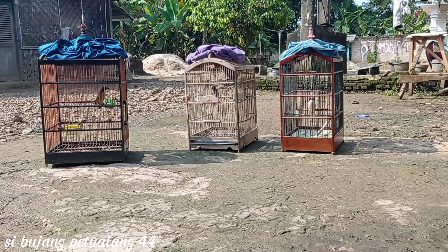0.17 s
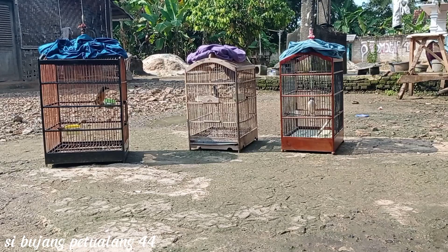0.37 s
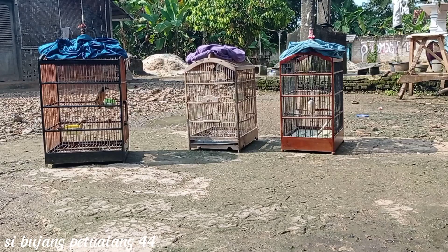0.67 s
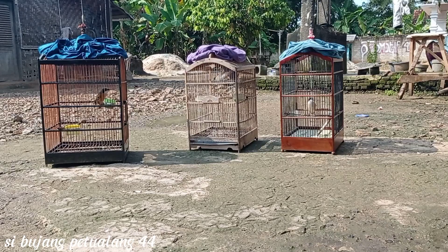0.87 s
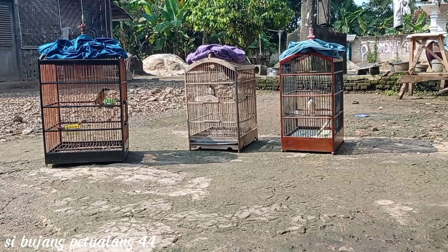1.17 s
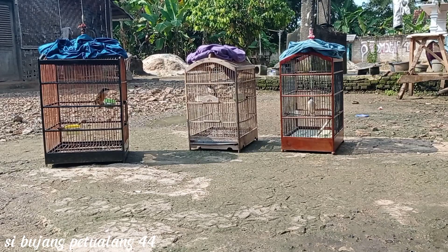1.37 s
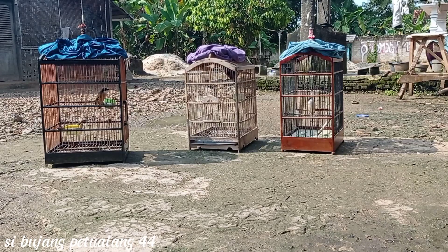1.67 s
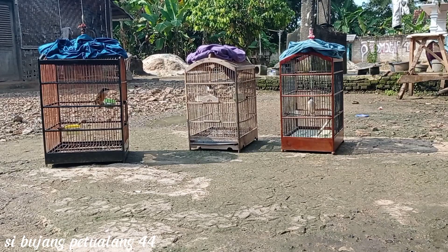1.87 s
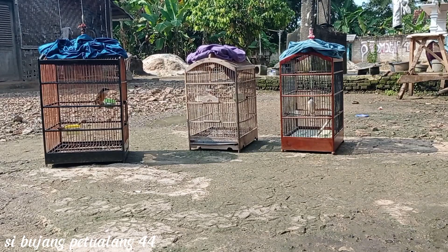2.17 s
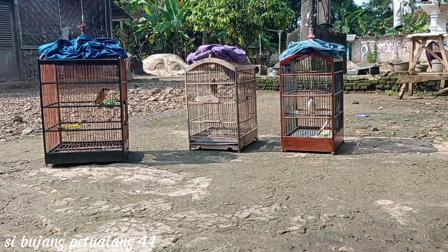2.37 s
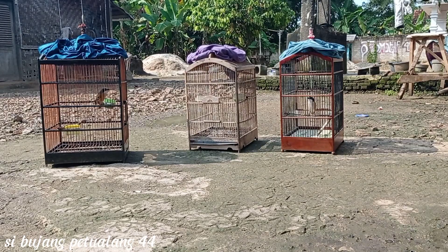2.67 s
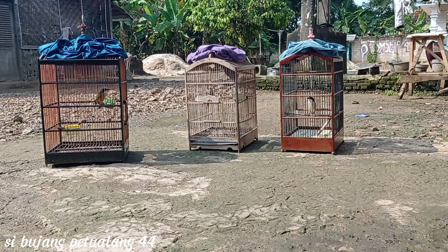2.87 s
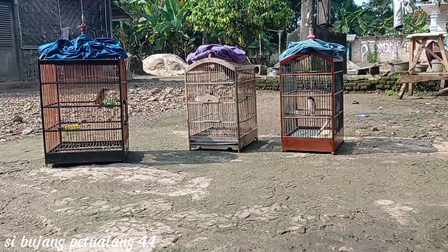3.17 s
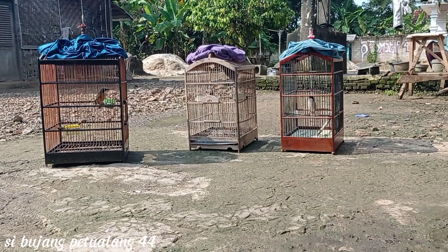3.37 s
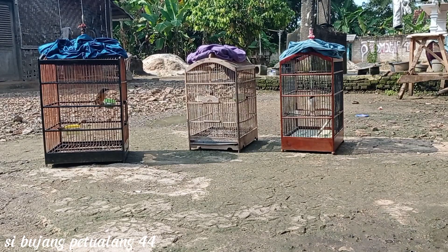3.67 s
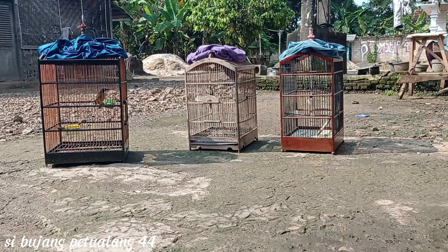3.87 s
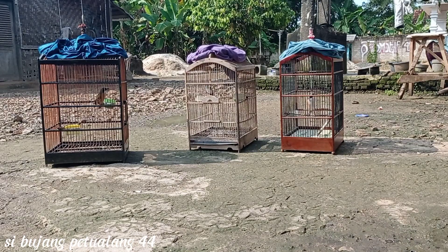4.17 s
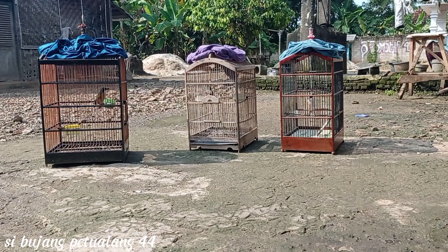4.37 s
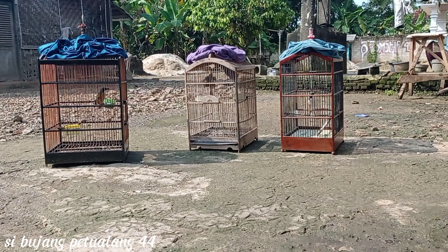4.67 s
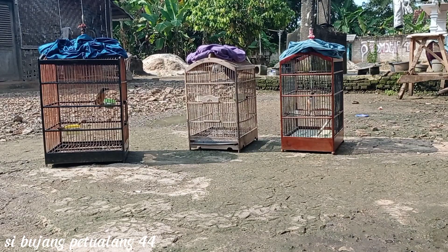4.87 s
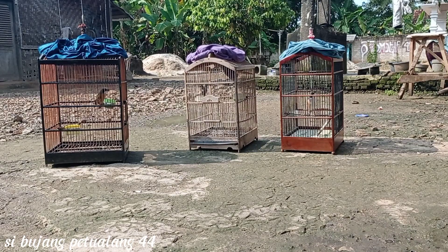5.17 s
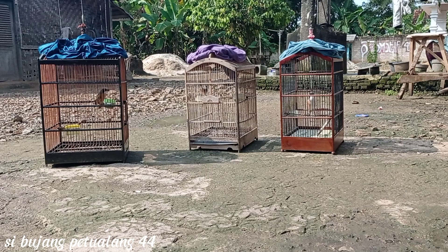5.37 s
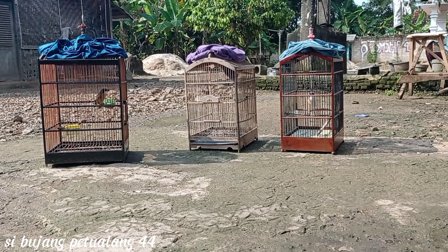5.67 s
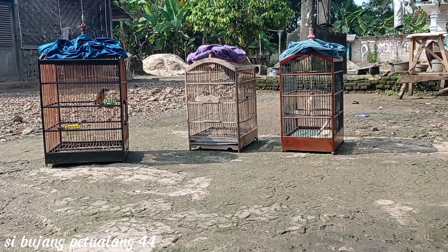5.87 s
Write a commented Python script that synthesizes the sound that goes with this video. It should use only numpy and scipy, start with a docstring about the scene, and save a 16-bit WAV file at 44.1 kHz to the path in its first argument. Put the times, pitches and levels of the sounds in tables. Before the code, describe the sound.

A caged songbird gives harsh rasps, breathy hisses and one squeal close by, with faint birds and distant traffic behind.

```python
"""A caged shrike scolds close to the microphone in a village yard: harsh rasps from its syrinx,
breathy hisses from its throat, one quick twisted squeal, and feet tapping the perches.
Farther off, other birds chip and whistle, insects trill and a rooster starts to crow.
An engine drones on a distant road under a soft, patchy background hiss. The ground and the
house walls throw the calls back to the one microphone."""
import sys
import numpy as np
from scipy import signal
from scipy.fft import rfft, irfft, next_fast_len
from scipy.io import wavfile
from scipy.ndimage import uniform_filter1d

SR = 44100
rng = np.random.default_rng(int(sys.argv[2]) if len(sys.argv) > 2 else 0)


def file_out(sig):
    """Save sig as 16-bit WAV at sys.argv[1]."""
    # one column per channel
    cols = np.atleast_2d(sig).T
    # limit, then scale
    lim = np.clip(cols, -1, 1)
    pcm = np.round(lim * 32767).astype(np.int16)
    wavfile.write(sys.argv[1], SR, pcm)


N = 265217
TIME = np.arange(N) / SR

# smeared partials, with side tones of a second membrane: (multiple of the pitch, width [Hz], gain [dB])
SYRINX_PARTIALS = [(0.998, 66, -16), (1.2, 123, -22), (1.82, 72, -7), (2, 65.3, -1), (2.28, 171, -4.5),
                   (2.681, 126.6, 1), (3, 157, 0.5), (3.179, 96, -6), (3.849, 323, -4.5), (4.901, 475, -7),
                   (5.7, 418, -8.5)]
# steady throat resonances: (frequency [Hz], width [Hz], gain [dB])
THROAT_MODES = [(2740, 550, -3), (3480, 260, -2.5), (4040, 350, 0.5)]
# colour of the breathy noise, with a thin fizz at 13-15 kHz: (frequency [Hz], gain [dB])
BREATHY_NOISE = [(900, -49), (1700, -38), (3000, 10), (6500, 8.5), (8300, -3.5), (9800, -17.5),
                 (11700, -7.5), (13000, -9.5), (13800, -23), (15300, -3), (16000, -20)]
def rasp(length, level_db, pitch_hz, crest=.39, jitter=.0131, air_db=-17, grit=.27, flutter=.59):
    """The syrinx beats on an arched pitch and breaks into chaos; the beak closes as the pitch sinks."""
    size = int(length * SR)
    share = np.linspace(0, 1, size)
    t = share * length
    closing = np.clip((share - crest) / (1 - crest), 0, 1)
    effort_db = -7 * np.exp(-t / .012) - 19 * closing ** 2.31  # quick attack, fade past the crest
    beak_db = -19 * closing
    arch = 1.01 - .85 * (share - crest) ** 2
    scoop = 1 - .2194 * np.exp(-t / .00398)  # the pitch snaps up from below
    phase = phase_of(pitch_hz * arch * scoop * (1 + jitter * wander(205, size).real))
    chaos = np.linspace(.603, 1.897, size)  # widens the partials as the call goes on
    voice = np.zeros(size)
    for k, width_hz, db in SYRINX_PARTIALS:
        shake, swell = wander(700, size).real, wander(120, size).real
        slip = phase_of(width_hz * chaos * shake) + 2 * np.pi * rng.random()
        gain = amp(db + beak_db * np.clip(k / 2 - 1, 0, 1))  # the beak dulls the upper partials
        voice += gain * (1 + flutter * chaos * swell) * np.cos(k * phase + slip)
    air = amp(air_db + beak_db) * noise(BREATHY_NOISE, size) * (1 + .97 * np.cos(phase))
    voice = unit(voice + ring(voice, THROAT_MODES)) + air
    voice *= np.exp(grit * wander(720, size).real)
    # steady air pressure holds the loudness even while the waveform tumbles
    voice /= np.sqrt(uniform_filter1d(voice ** 2, size=350) + 1e-9)
    return amp(level_db + effort_db) * voice * signal.windows.tukey(size, .04)


# colour of the hiss with the beak half shut, then wide open: (frequency [Hz], gain [dB])
BEAK_HALF_SHUT = [(650, -32), (1250, -7), (1650, -10), (2300, 1.5), (3100, -0.5), (3600, 3), (5400, 4.5),
                  (7000, -5.5), (7700, -4), (9500, -19), (10800, -56), (12500, -29), (14900, -21),
                  (16000, -40)]
BEAK_OPEN = [(650, -33), (1250, -15), (1650, -30), (2700, -6.5), (3300, -7.5), (4050, 5), (4600, -1),
             (5400, 3), (6100, -12), (8100, -21.5), (10700, -36.5), (13500, -46), (15100, -26),
             (16000, -40)]
def hiss(peak_db, beak, attack_s=.019, swell_s=.11, hold_s=.056, release_s=.05, grit=.18):
    """Air rattles through the throat over a weak rasp; the beak opens as the hiss swells."""
    held = swell_s + hold_s
    length = held + release_s
    t = np.arange(int(length * SR)) / SR
    level_db = peak_db + np.interp(t, [0, attack_s, swell_s, held, length], [-20, -11, 0, -7, -36])
    opening = beak * np.minimum(t / swell_s, 1) ** 2
    shut = unit(noise(BEAK_HALF_SHUT, len(t)) + rasp(length, level_db=-6.5, pitch_hz=1131))
    air = np.sqrt(1 - opening) * shut + np.sqrt(opening) * noise(BEAK_OPEN, len(t))
    return amp(level_db) * unit(air * np.exp(grit * wander(1100, len(t)).real))


# course of the squeal: (time [s], pitch [Hz], level [dB], octave gain [dB], roughness [0-1])
SQUEAL_COURSE = [(2.702, 1867, -31.5, 5, .5), (2.713, 2195, -14.5, 9, 0.4), (2.722, 2603, -15, 5, 0.77),
                 (2.733, 2020, -15, 9, 0.19), (2.759, 2075, -19.5, -9.5, .05), (2.763, 2100, -9, 19, 0.18),
                 (2.775, 2213, -9.5, 12, 0.22), (2.778, 3314, -13, 9, 0.54), (2.786, 3370, -13, 9.5, 0.65),
                 (2.792, 2603, -9, 6.5, 0.63), (2.805, 2656, -13.5, 21, 0.26),
                 (2.812, 3046, -12.5, 23, 0.67), (2.856, 2903, -24.5, 8, 0.68),
                 (2.864, 3430, -21, -21, 0.15), (2.882, 3650, -12.5, -20, .1)]
# its closing pips: (time [s], length [s], pitch [Hz], level [dB])
SQUEAL_PIPS = [(2.880, .012, 4020, -8.5), (2.891, .0107, 2794, -17.5), (2.9, .015, 4666, -7.5)]
def squeal(scratch=.22):
    """One twisted, scratchy squeal that breaks upward halfway and ends in sharp pips."""
    out = np.zeros(N)
    times, *columns = np.transpose(SQUEAL_COURSE)
    t = np.arange(times[0], times[-1], 1 / SR)
    hz, db, octave_db, rough = (np.interp(t, times, column) for column in columns)
    tone = whistle(hz, octave_db, rough, jitter=.134, upper_db=-20.5, breath_db=1)
    tone /= np.hypot(1, amp(octave_db))
    tone *= 1 + scratch * wander(484, len(t)).real
    add(out, times[0], amp(db) * tone * signal.windows.tukey(len(t), .03))
    for start, length, pip_hz, pip_db in SQUEAL_PIPS:
        pip = note(length, pip_hz, .077, pip_db, octave_db=-33.5, rough=.27, upper_db=-20, breath_db=-12.5)
        add(out, start, pip)
    return out


# knocks on the cage: (time [s], level [dB])
CAGE_TAPS = [(0.778, -34.5), (2.579, -35), (3.007, -30), (3.026, -30), (3.325, -31.5), (4.871, -39)]
# colour of the bars: (frequency [Hz], gain [dB])
BAMBOO_COLOUR = [(900, 7), (2000, 0), (4500, 7.5), (7500, -4), (10000, -25), (13500, -26), (15200, -10)]
def taps(t60=.081):
    """Feet and beaks knock drily on the bamboo bars."""
    out, t = np.zeros(N), np.arange(4096) / SR
    for start, db in CAGE_TAPS:
        add(out, start, amp(db - 60 * t / t60) * noise(BAMBOO_COLOUR, len(t)))
    return out


# close rasps: (start [s], end [s], level [dB], pitch near the crest [Hz])
RASP_CALLS = [(0.928, 1.102, -11, 1295), (2.338, 2.486, -11, 1289), (3.356, 3.522, -12.5, 1283),
              (4.566, 4.729, -12.5, 1271), (5.377, 5.57, -12, 1266)]
# close hisses: (time [s], peak level [dB], beak opening [0-1])
HISS_CALLS = [(0.056, -18.5, 0.71), (0.477, -14, 0.78), (4.075, -12.5, 0.98), (4.435, -16, 0.72),
              (5.98, -11.5, 0.9)]
def shrike():
    """All that comes from the cage by the microphone: squeal, taps, rasps and hisses."""
    out = squeal() + taps()
    for start, end, level_db, pitch_hz in RASP_CALLS:
        add(out, start, rasp(end - start, level_db, pitch_hz))
    for start, peak_db, beak in HISS_CALLS:
        add(out, start, hiss(peak_db, beak))
    return out


def whistle(hz, octave_db, rough, jitter=.114, upper_db=-35, breath_db=-35):
    """A whistle with overtones on a pitch curve; roughness shakes its pitch and adds air."""
    phase = phase_of(hz * (1 + jitter * rough * wander(1040, len(hz)).real))
    upper = sum(amp(-6 * (k - 3.5) + read(BREATHY_NOISE, k * hz)) * np.sin(k * phase) * (k * hz < SR / 2)
                for k in range(3, 8))
    tone = np.sin(phase) + amp(octave_db) * np.sin(2 * phase) + amp(upper_db + octave_db / 2) * upper
    return np.sqrt(2) * (tone + amp(breath_db) * rough * noise(BREATHY_NOISE, len(hz)))


def note(length, hz, rise, db, **timbre):
    """One short whistle that glides evenly through its pitch; rise is a share of that pitch."""
    glide = 1 + rise * np.linspace(-.5, .5, int(length * SR))
    return amp(db) * whistle(hz * glide, **timbre) * signal.windows.tukey(len(glide), .35)


# thin peeps and runs of ticks around the cage: (time [s], pitch [Hz], level [dB], roughness [0-1])
YARD_PEEPS = [(1.342, 6720, -45, 0.4), (2.092, 6400, -41, 0.48), (2.287, 6133, -38.5, .5),
              (2.654, 5980, -40, .6), (3.14, 5680, -36.5, .7), (3.302, 5430, -34.5, 0.54),
              (3.906, 6170, -34, 0.09), (4.819, 6720, -36.5, 0.22), (5.033, 5925, -35, .5),
              (5.209, 5830, -34.5, 0.47), (5.365, 6160, -34.5, 0.25)]
YARD_TICKS = [(.266, 3600, -27.5, 0.47), (.298, 3600, -34, 0.5), (.836, 4440, -34.5, 0.5),
              (1.492, 4080, -41.5, .03), (1.562, 4195, -34.5, 0.06), (1.648, 3880, -42, .5),
              (3.63, 3690, -38, .4), (3.689, 3905, -37, 0.26), (3.752, 3886, -34.5, 0.14),
              (3.824, 3930, -38, 0.26)]
# hoarse chatter: (time [s], length [s], pitch [Hz], level [dB], octave gain [dB])
YARD_CHATTER = [(1.751, 0.088, 2717, -44, 4.5), (1.754, 0.016, 3910, -37.5, -39),
                (1.805, 0.022, 3490, -40, -18), (1.855, 0.035, 4130, -31.5, -39),
                (1.891, 0.029, 3404, -36.5, -11), (5.858, 0.083, 6210, -41, -30)]
# slurs from farther off: (time [s], length [s], pitch [Hz], rise [share], level [dB], roughness [0-1])
FAR_WHISTLES = [(1.66, 0.16, 3130, 0.024, -51, 0.32), (2.082, 0.33, 2963, .08, -48.5, 0.48),
                (3.622, 0.3435, 2566, -0.13, -48, .9), (5.113, 0.117, 1813, 0.082, -38, 0.13),
                (5.213, 0.074, 1602, -0.2, -38.5, 0.6)]
def neighbours():
    """Other birds peep, tick, chatter and whistle across the yard."""
    out = np.zeros(N)
    for start, hz, db, rough in YARD_PEEPS:
        add(out, start, note(length=.028, hz=hz, rise=.074, db=db, octave_db=-37, rough=rough))
    for start, hz, db, rough in YARD_TICKS:
        add(out, start, note(length=.013, hz=hz, rise=-.04, db=db, octave_db=-39, rough=rough))
    for start, length, hz, db, octave_db in YARD_CHATTER:
        add(out, start, note(length, hz, rise=.023, db=db, octave_db=octave_db, rough=.87))
    for start, length, hz, rise, db, rough in FAR_WHISTLES:
        add(out, start, note(length, hz, rise, db, octave_db=-47, rough=rough))
    return out


# resonances of the rooster's throat: (frequency [Hz], width [Hz], gain [dB])
ROOSTER_MODES = [(780, 85, -8), (1160, 110, 0), (1620, 130, 3)]
def rooster(start_s=5.76, attack_s=.018, rise_s=.184, top_hz=391, level_db=-41.5, flutter_db=4):
    """A far crow scoops up in pitch: wavering harmonics, rougher toward the top, ring the throat."""
    out, t = np.zeros(N), np.arange(SR // 2) / SR
    scoop = .09 * (1 - t / rise_s) ** 2
    phase = phase_of(top_hz * (1 - scoop + .014 * wander(40, len(t)).real))
    slip = phase_of(9 * wander(250, len(t)).real)
    folds = sum(np.cos(k * phase + (k - 1) ** 2 * slip) for k in range(2, 6))
    level = amp(level_db + flutter_db * wander(35, len(t)).real) * np.minimum(t / attack_s, 1)
    add(out, start_s, level * unit(ring(folds, ROOSTER_MODES)))
    return out


# faint bands of insect song: (frequency [Hz], width [Hz], level [dB])
INSECT_BANDS = [(5760, 29, -53.5), (11530, 100, -67)]
def insects(swell_db=4):
    """Thin, unbroken trills swell and fade behind the birds."""
    out = np.zeros(N)
    for hz, width, db in INSECT_BANDS:
        level = amp(db + swell_db * wander(4.1, N).real)
        trill = wander(width, N) * np.exp(2j * np.pi * hz * TIME)
        out += level * unit(trill.real)
    return out


# the low drone fades in and dips after two loud calls: (time [s], relative level [dB])
DRONE_LEVEL = [(0.15, -58), (0.28, -39.5), (2.66, -33), (2.92, -47), (3.21, -29.5), (5.33, -28.5),
               (5.62, -39), (5.71, -33), (6.0, -29)]
# its harmonics: (multiple of the firing rate, gain [dB])
FIRING_ORDERS = [(3, -6.5), (4, -5.5), (5, 2), (6, -7.5), (10, -18.5), (11, -11.5), (12, -10.5)]
def engine(firing_hz=28.43, trim_db=-1.5, waver=.32):
    """A distant engine drones on wavering harmonics of its slowly drifting firing rate."""
    phase = phase_of(firing_hz * (1 + .01224 * wander(2.03, N).real))
    drone = sum(amp(db) * (1 + waver * wander(18, N).real) * np.cos(k * phase + 2 * np.pi * rng.random())
                for k, db in FIRING_ORDERS)
    return amp(trim_db + np.interp(TIME, *np.transpose(DRONE_LEVEL))) * unit(drone)


# the roar fades in, dips after the squeal and sinks toward the end: (time [s], level [dB])
ROAR_LEVEL = [(.1, -66), (.33, -44), (1.1, -44), (1.8, -37.5), (2.7, -37), (2.9, -42.5), (3.4, -37.5),
              (4.8, -40), (6, -44)]
# colours of the road's low rumble and its roar: (frequency [Hz], gain [dB])
ROAD_RUMBLE = [(25, -42), (42, -33), (58, 10.5), (78, 15.5), (100, 15), (125, 10.5), (180, 10.5),
               (260, -44)]
ROAD_ROAR = [(120, -8), (200, 2.5), (360, 4.5), (480, -4), (650, -8), (950, -9), (1400, -21), (2500, -24),
             (8000, -62)]
def road(rumble_db=-37.5, swell_db=2.5, follow=.42):
    """The dull roar of a far road, over a low rumble that partly follows its level."""
    roar_db = np.interp(TIME, *np.transpose(ROAR_LEVEL))
    drift_db = follow * (roar_db - roar_db.mean()) + swell_db * wander(3.7, N).real
    rumble = amp(rumble_db + drift_db) * noise(ROAD_RUMBLE, N)
    roar = amp(roar_db) * patchy(noise(ROAD_ROAR, N), depth_db=5, size=3)
    return rumble + roar


# colour of the background hiss: (frequency [Hz], gain [dB])
BACKGROUND_COLOUR = [(600, -2), (1500, -2), (2400, -6), (3000, 11.5), (3800, -8), (5000, -0.5), (6200, 1.5),
                     (8000, -32), (10000, -45), (16000, -54)]
def background_hiss(level_db=-52):
    """A soft hiss with patchy, shifting holes in its spectrum lies behind everything."""
    return amp(level_db) * patchy(noise(BACKGROUND_COLOUR, N), depth_db=6, size=25)


def ground(x, lag_s=.00075, share=.055):
    """The bounce off hard ground reaches the microphone a moment late and ribs the spectrum."""
    return (x + share * np.interp(TIME - lag_s, TIME, x)) / np.hypot(1, share)


# decay of the yard's tail: (frequency [Hz], time to fall 60 dB [s])
YARD_DECAY = [(500, 0.72), (3000, 0.54), (6000, 0.64), (9000, 0.34), (15000, 0.11)]
def yard(x, near_db, far_db, near_t60, build_s=.049):
    """Direct sound, quick scatter from cages and ground, and a long tail from walls and trees."""
    t = np.arange(SR) / SR
    near, far = rng.choice([-1., 1.], (2, SR)) * (rng.random((2, SR)) < 2000 / SR)  # sparse echoes
    near = near * amp(-60 * t / near_t60) * (t > .002)
    hz, when, spectrum = signal.stft(far * np.minimum(t / build_s, 1), SR, nperseg=256)
    decay = amp(-60 * when / read(YARD_DECAY, hz)[:, None])
    far = signal.istft(spectrum * decay, SR, nperseg=256)[1][:SR]
    echo = amp(near_db) * near / np.linalg.norm(near) + amp(far_db) * far / np.linalg.norm(far)
    return x + signal.fftconvolve(x, echo)[:N]


def amp(db):
    """Decibels to gain."""
    return 10 ** (np.asarray(db) / 20)


def unit(x):
    """Scales to rms 1."""
    return x / np.sqrt(np.mean(abs(x) ** 2) + 1e-20)


def read(points, hz):
    """Reads a spectrum table on a log-frequency axis."""
    f, value = np.transpose(points)
    return np.interp(np.log(hz + 1), np.log(f), value)


def add(mix, start_s, sound):
    """Adds a sound to the mix at its start time."""
    part = mix[round(start_s * SR):][:len(sound)]
    part += sound[:len(part)]


def noise(colour, size):
    """Noise of a given spectrum, rms 1."""
    padded = next_fast_len(size)
    gain = amp(read(colour, np.fft.rfftfreq(padded, 1 / SR)))
    return unit(irfft(rfft(rng.standard_normal(padded)) * gain, padded)[:size])


def wander(width_hz, size):
    """Complex random flutter with a bell-shaped spectrum of the given width, rms 1."""
    padded = next_fast_len(size)
    reach = min(4096, padded // 2)
    bins = np.arange(-reach, reach)
    bell = np.exp(-2 * (bins * SR / padded / width_hz) ** 2)
    spectrum = np.zeros(padded, complex)
    spectrum[bins] = (rng.standard_normal((len(bins), 2)) @ [1, 1j]) * bell
    return unit(np.fft.ifft(spectrum)[:size])


def phase_of(hz):
    """Running phase of a pitch curve."""
    return 2 * np.pi * np.cumsum(hz) / SR


def ring(x, modes):
    """Passes a sound through resonances side by side."""
    return sum(amp(db) * signal.lfilter(*signal.iirpeak(hz, hz / width, SR), x) for hz, width, db in modes)


def patchy(x, depth_db, size):
    """Lets patches of the spectrum, size bins wide, swell and sink on their own."""
    spectrum = signal.stft(x, nperseg=2048)[2]
    patches = uniform_filter1d(rng.standard_normal(spectrum.shape), size=size, axis=0)
    swells = unit(uniform_filter1d(patches, size=7, axis=1))
    return unit(signal.istft(spectrum * amp(depth_db * swells), nperseg=2048)[1][:N])


def scene():
    """From one spot in the yard: the shrike close by, its neighbours farther off, the village behind."""
    close = ground(shrike())
    farther = neighbours() + rooster()
    birds = yard(close, near_db=-4, far_db=-13, near_t60=.23)
    birds += yard(farther, near_db=-1, far_db=-8.5, near_t60=.12)
    return (birds + insects() + engine() + road() + background_hiss())[None]


def record(dry, ceiling=.96, edge_hz=15650):
    """The mono microphone signal fades in, its loudest peaks are rounded off and its top is cut."""
    x = dry * np.interp(TIME, [.076, .08, .25], [0, .7, 1])
    x = x / (1 + (x / ceiling) ** 8) ** (1 / 8)
    lowpass = signal.firwin(511, edge_hz, window=("kaiser", 9), fs=SR)
    return signal.oaconvolve(x, lowpass[None], "same")


dry = scene()
out = record(dry)
file_out(out)
```